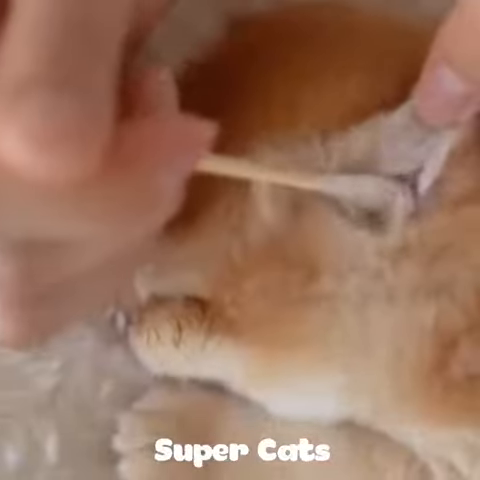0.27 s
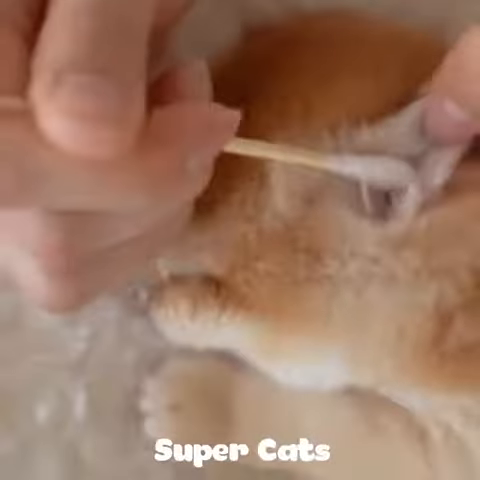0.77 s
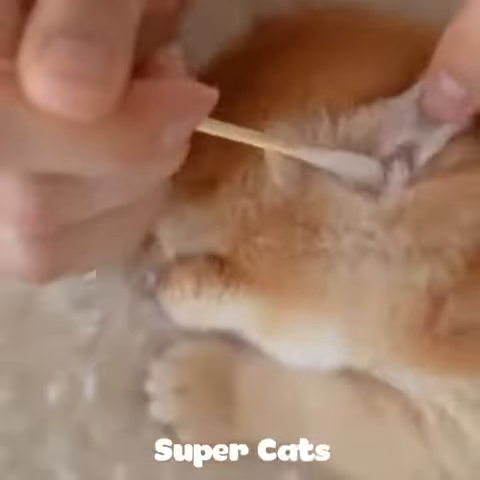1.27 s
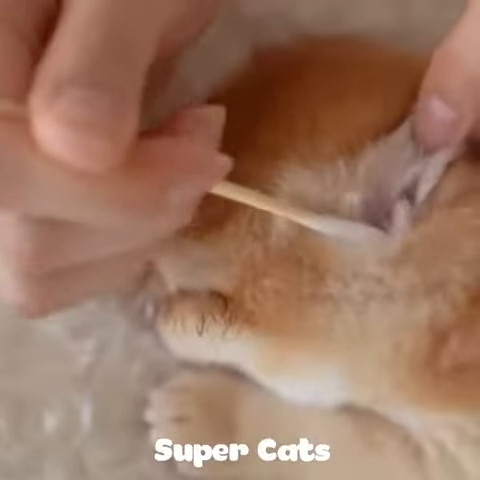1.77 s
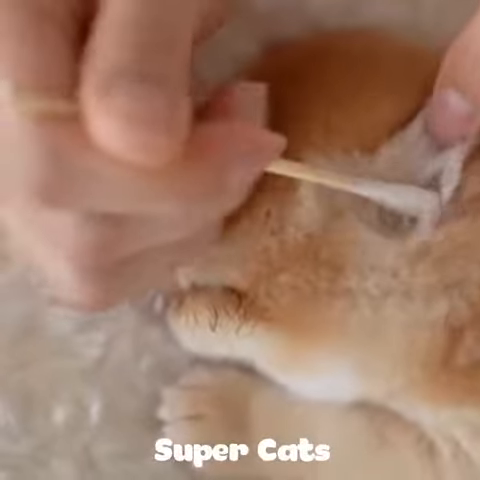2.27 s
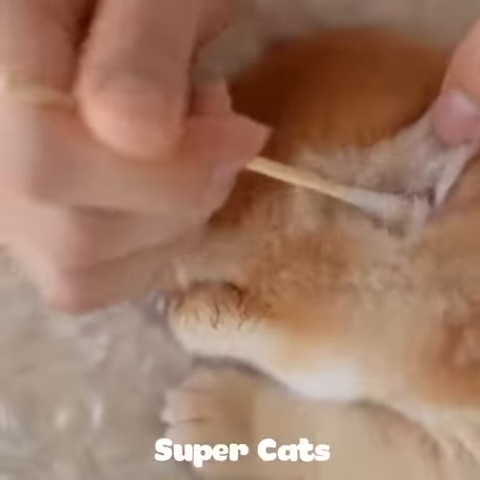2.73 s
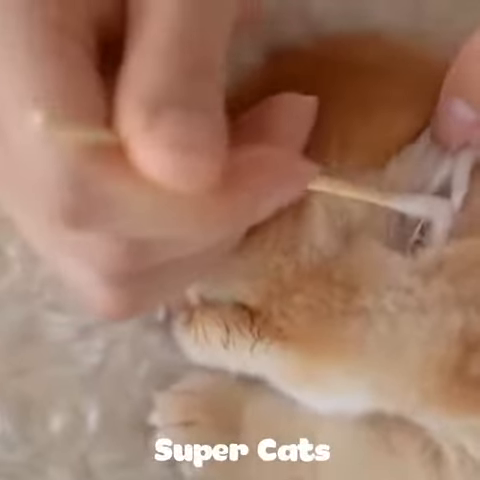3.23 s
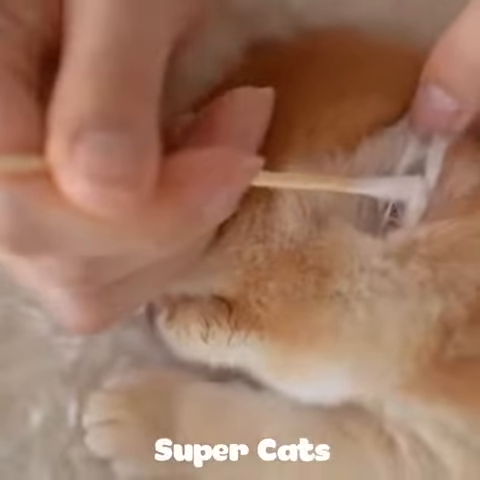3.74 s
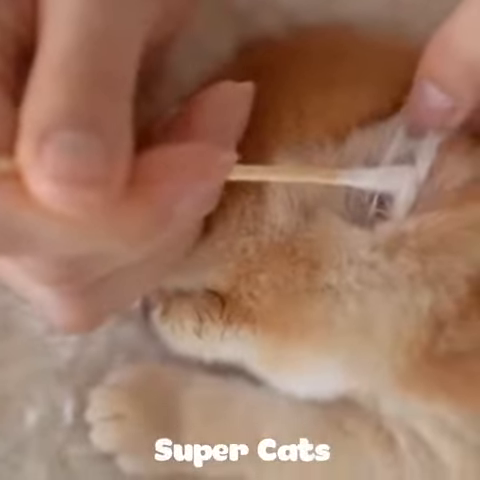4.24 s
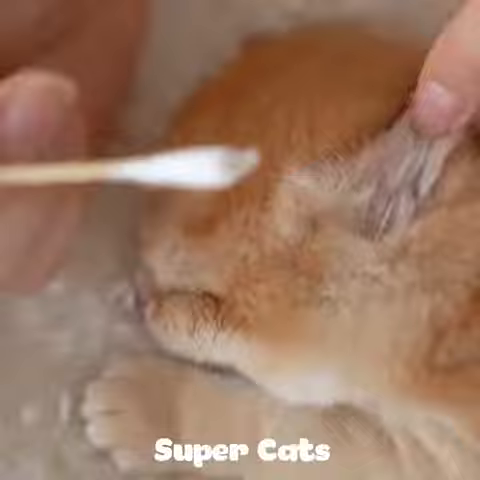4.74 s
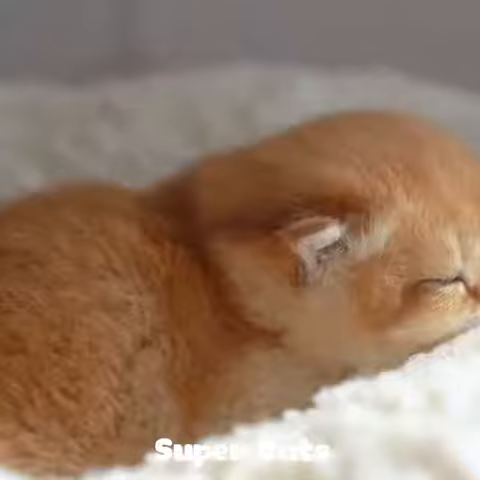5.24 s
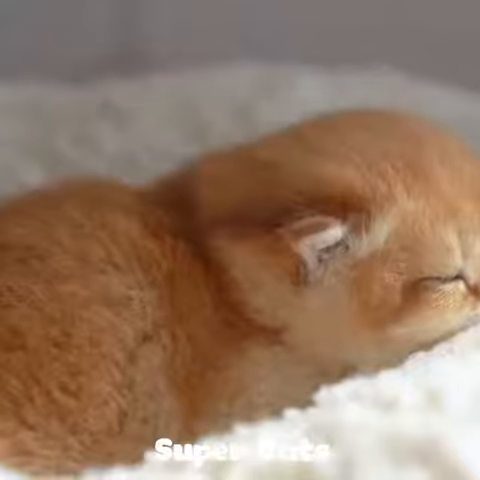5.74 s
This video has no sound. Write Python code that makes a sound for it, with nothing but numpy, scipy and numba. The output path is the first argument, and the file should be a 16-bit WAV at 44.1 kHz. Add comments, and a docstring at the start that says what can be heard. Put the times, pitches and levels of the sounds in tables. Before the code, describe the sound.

A cotton swab works back and forth in a kitten's ear, right against the left microphone. Its fibres hiss over skin and fur, creaking and slipping with small snaps and dull thuds. A faint gurgle comes from the right, then tacky ticks follow on the left and the swab swishes out. The quiet room then gives way to a low, wavering hum.

```python
"""Cleaning a kitten's ear

A cotton swab is worked back and forth in a kitten's ear, right at the left microphone.
Its fibres hiss over skin and fur. It creaks as it grips, catches and slips with dull thuds,
comes unstuck in tacky ticks and is drawn out with a swish.
A faint gurgle sounds on the right; at the end the quiet room gives way to a low hum."""
import sys
import numpy as np
from scipy import signal
from scipy.fft import rfft, irfft, next_fast_len
from scipy.io import wavfile
from scipy.ndimage import uniform_filter1d
from numba import njit

SR = 44100
rng = np.random.default_rng(int(sys.argv[2]) if len(sys.argv) > 2 else 0)


def pcm_store(signal):
    """Save signal as 16-bit PCM."""
    levels = np.round(np.clip(np.atleast_2d(signal), -1, 1) * 32767)
    wavfile.write(sys.argv[1], SR, levels.astype(np.int16).T)


N = 264644

# Tacky skin comes unstuck: (time [s], relative tick level [dB], pitch [Hz], relative ring level [dB])
TACKY_TICKS = [(3.6379, -18, 2900, -36), (3.706, -19, 2880, -40), (3.7184, -23, 3020, -37),
               (3.7317, -21.5, 3190, -35.5), (3.789, -26, 2770, -34), (3.8157, -22.5, 2830, -37),
               (3.837, -23.5, 2920, -37), (3.8929, -21, 2740, -44), (3.909, -32, 3130, -40),
               (3.9223, -24, 2800, -36.5), (3.9489, -26, 2360, -39), (3.9671, -20.5, 2900, -39),
               (4.0498, -20.5, 2940, -40.5), (4.144, -21.5, 2370, -40), (4.1706, -21.5, 2390, -37),
               (4.1874, -21, 2300, -38), (4.2026, -19.5, 2380, -35), (4.4238, -40, 2410, -59),
               (4.5702, -43, 3332, -56)]
# Runs of catching and letting go: (start [s], end [s], slips [per s], relative snap level [dB],
# relative thud level [dB], growth of the snap over the run [dB])
SLIP_RUNS = [(0.5573, 0.5797, 52, -17.5, -20.5, 1), (0.774, 0.816, 98, -19.5, -20.5, -6),
             (0.8325, 0.8467, 77, -15, -24, -4), (1.0734, 1.0818, 106, -24.5, -20, 3),
             (1.4654, 1.5, 128, -16, -37, 3), (1.508, 1.54, 125, -20.5, -33, -1),
             (1.5542, 1.5752, 97, -20.5, -20, 1), (1.5832, 1.5945, 105, -21, -19, 9.5),
             (1.7909, 1.7991, 122, -19.5, -44, -7), (1.8324, 1.859, 78, -19.5, -21.5, 3),
             (2.4666, 2.5793, 124, -16.5, -31, -2.5), (2.5911, 2.6253, 90, -16.5, -30, -4),
             (2.6336, 2.659, 108, -16.5, -26, 2.5), (2.6686, 2.709, 51, -21, -29, 5),
             (2.9247, 3.034, 85, -20, -21, -5.5), (3.0433, 3.0885, 87, -20, -23, -4),
             (3.109, 3.1483, 52, -18.5, -25.5, -7.5), (3.162, 3.187, 100, -23, -23.5, -6),
             (3.241, 3.2885, 65, -21, -20.5, -10.5), (3.3, 3.345, 67, -31, -25.5, -2)]


def from_db(db):
    """Turn decibels into a gain, the number a sound is multiplied by."""
    return 10 ** (np.asarray(db) / 20)


def rms_one(x):
    """Scale a sound to an average power of 1."""
    return x / np.sqrt(np.mean(x ** 2) + 1e-20)


def peak_one(x):
    """Scale a sound so that its outline peaks at 1."""
    return x / np.abs(signal.hilbert(x)).max()


def add(track, s, sound):
    """Mix a short sound into a track, s seconds in."""
    at = int(round(s * SR))
    track[at:at + len(sound)] += sound[:N - at]


def colour(x, spectrum):
    """Shape the tone with a curve of (frequency [Hz], level [dB]) points."""
    hz, db = np.transpose(spectrum)
    size = next_fast_len(N + 4096)
    bin_hz = np.maximum(np.fft.rfftfreq(size, 1 / SR), 1)
    gain = from_db(np.interp(np.log(bin_hz), np.log(hz), db))
    return irfft(rfft(x, size) * gain, size)[:N]


def soften(x, cut_hz):
    """Round off the treble, as a soft contact does."""
    return signal.sosfilt(signal.butter(2, cut_hz, fs=SR, output="sos"), x)


def noise(spectrum):
    """Steady noise with the given tone, at power 1."""
    return rms_one(colour(rng.standard_normal(N), spectrum))


def drift(rate):
    """A random wander that heads for a new value `rate` times a second."""
    place = np.arange(N) * rate / SR
    return rms_one(np.interp(place, np.arange(8192), rng.standard_normal(8192)))


def grains(per_s, spread_db):
    """Tiny clicks of uneven size at random moments."""
    sizes = from_db(spread_db * np.minimum(rng.exponential(1, N), 4))
    return sizes * rng.choice([-1, 1], N) * (rng.random(N) < per_s / SR)


def resonate(x, hz, width_hz):
    """Make a sound ring at one pitch; a narrower width rings longer."""
    r = np.exp(-np.pi * width_hz / SR)
    feedback = [1, -2 * r * np.cos(2 * np.pi * hz / SR), r * r]
    return signal.lfilter(np.array([1, 0, -1]) * (1 - r * r) / 2, feedback, x + 1e-18)


@njit
def glide(x, turn, r):
    """A ringing filter whose pitch (`turn`, in radians per sample) can move."""
    y = np.zeros(len(x))
    for i in range(2, len(x)):
        push = (1 - r * r) / 2 * (x[i] - x[i - 2])
        y[i] = push + 2 * r * np.cos(turn[i]) * y[i - 1] - r * r * y[i - 2]
    return y


def focused_ring(x, hz, width_hz):
    """Filter twice around a steady or sliding pitch, and scale to power 1."""
    turn = np.full(len(x), 2 * np.pi * hz / SR)
    r = np.exp(-np.pi * width_hz / SR)
    return rms_one(glide(glide(x, turn, r), turn, r))


def swell(s, rise_s, fall_s, rise_power=1.01, fall_power=0.88):
    """Gain of a movement that speeds up evenly until time s, then slows to rest."""
    t = np.arange(N) / SR - s
    speed = np.maximum(1 - np.maximum(-t / rise_s, t / fall_s), 0)
    return speed ** np.where(t < 0, rise_power, fall_power)


def background(room_db=-44.5, handling_db=-47, late_room_db=-36, hum_at_s=5.245, hum_hz=56.6, hum_db=-32):
    """A quiet room with a soft handling rumble; later a wavering low hum in a louder room."""
    # Tone of the room before and during the hum: (frequency [Hz], relative level [dB])
    quiet_tone = [(22, -2.5), (40, -3), (100, -0.5), (135, -5.5), (200, -9), (260, -12.5), (500, -27.5),
                  (1000, -27.5), (2000, -40.5), (4000, -47), (8800, -47), (10000, -50.5), (11500, -45),
                  (15000, -45.5)]
    humming_tone = [(20, -8.5), (36, 0.5), (55, -4.5), (80, -8.5), (130, -15.5), (270, -16.5), (420, -27),
                    (850, -33), (2000, -48.5), (4000, -54), (8700, -52.5), (10000, -59), (11500, -51),
                    (15000, -49)]
    t = np.arange(N) / SR
    handled = np.interp(t, [4.35, 4.7], [1, 0])
    handling = from_db(handling_db) * handled * np.array([noise(quiet_tone), noise(quiet_tone)])
    hum = np.sqrt(2) * np.sin(2 * np.pi * hum_hz * t) * from_db(hum_db + drift(rate=5.4))
    quiet = from_db(room_db) * noise(quiet_tone) + handling
    humming = hum + from_db(late_room_db) * noise(humming_tone)
    late = np.clip((t - hum_at_s) / 0.0097, 0, 1)
    return (1 - late) * quiet + late * humming


def gurgle():
    """A short, low bubbling amid three swells of a thin, wavering whine."""
    # The bubbling: (loudest at [s], rise [s], fall [s], level [dB])
    bubble_swell = (3.5, 0.01, 0.04, -27)
    # The whine: (loudest at [s], rise [s], fall [s], level [dB], pitch [Hz])
    whines = [(3.275, 0.052, .06, -36, 388), (3.425, 0.07, 0.031, -38, 418), (3.56, 0.04, 0.058, -45, 397)]
    *shape, db = bubble_swell
    bubbling = focused_ring(grains(per_s=800, spread_db=3), hz=205, width_hz=150)
    out = from_db(db) * swell(*shape) * soften(bubbling, cut_hz=420)
    wavering_s = np.cumsum(1 + 0.021 * drift(rate=130)) / SR
    for *shape, db, hz in whines:
        out += from_db(db) * swell(*shape) * np.sqrt(2) * np.sin(2 * np.pi * hz * wavering_s)
    return out


def drone(hz=112, db=-37):
    """A soft, wavering drone sounds while the swab rests before the first stroke."""
    held = np.interp(np.arange(N) / SR, [.42, .55], [1, 0])
    phase = 2 * np.pi * np.cumsum(hz * (1 + 0.057 * drift(rate=51.3))) / SR
    return held * from_db(db + 2 * drift(rate=41)) * np.sqrt(2) * np.sin(phase)


def thud(hz, fade_s):
    """Soft flesh swings and quickly settles."""
    t = np.arange(SR // 8) / SR
    return np.sin(2 * np.pi * hz * t) * np.exp(-t / fade_s)


def bumps(fade_s=0.026, boost_db=3, push_s=0.0035):
    """The ear flap and head are softly nudged and spring back with a slow, heavy swing."""
    # The nudges: (time [s], relative level [dB], pitch [Hz])
    nudges = [(0.849, -23.5, 74.6), (1.078, -23.5, 149.8), (1.21, -27, 119), (1.27, -21.5, 155.7),
              (1.599, -28, 130), (1.931, -28, 169), (2.119, -24.5, 82), (2.169, -28, 84),
              (3.437, -22.5, 64.6), (3.59, -26, 83.4), (4.319, -19, 66), (4.629, -31.5, 86.1)]
    out = np.zeros(N)
    for s, db, hz in nudges:
        swing = thud(hz, fade_s)
        push = 1 - np.exp(-np.arange(len(swing)) / SR / push_s)
        add(out, s, from_db(db + boost_db) * swing * push)
    return out


def touching(lift_s=4.43, fade_s=0.47):
    """A gain of 1 while the swab is in the ear, dying away as it is lifted."""
    return np.clip(1 - (np.arange(N) / SR - lift_s) / fade_s, 0, 1) ** 2


def rumble(drag_gain, resting_db=-43, vs_drag_db=-2, vs_thud_db=-7, linger_s=0.041):
    """Pressed flesh shudders under the swab: more as it drags, most during a run of slips."""
    # Tone of the flesh: (frequency [Hz], relative level [dB])
    flesh_tone = [(20, -18), (40, -18.5), (75, -0.5), (115, 1.5), (200, -5), (300, -14.5), (500, -18),
                  (1500, -46.5)]
    t = np.arange(N) / SR
    power = (from_db(resting_db) * touching()) ** 2 + (from_db(vs_drag_db) * drag_gain) ** 2
    for start_s, end_s, _, _, thud_db, _ in SLIP_RUNS:
        during = np.interp(t, [start_s - linger_s, start_s, end_s, end_s + linger_s], [0, 1, 1, 0])
        power += (from_db(thud_db + vs_thud_db) * during) ** 2
    shudder = noise(flesh_tone)
    strength = np.sqrt(uniform_filter1d(shudder ** 2, size=1500) + 1e-6)
    return np.sqrt(power) * shudder / strength  # dividing evens out the noise's own swells


def release(crumble, crumble_s):
    """One sharp release, trailed by a few fibres that let go after it."""
    t = np.arange(SR // 8) / SR
    return (t == 0) + crumble * rng.standard_normal(len(t)) * np.exp(-t / crumble_s)


def ticks(hollow_hz=1200, ring_boost_db=12, tick_boost_db=5, delay_s=0.001007):
    """Tiny sticky contacts stretch and part, each a bright tick over a hollow ring of the ear."""
    out = np.zeros(N)
    for s, tick_db, hz, ring_db in TACKY_TICKS:
        kick = soften(release(crumble=0.081, crumble_s=0.0022), cut_hz=12000)
        bright = resonate(resonate(kick, hz, width_hz=1000), hz, width_hz=4600)
        hollow = resonate(resonate(kick, hollow_hz, width_hz=570), hollow_hz, width_hz=1340)
        tick = from_db(tick_db + tick_boost_db) * peak_one(bright)
        ring = from_db(ring_db + ring_boost_db) * peak_one(hollow)
        add(out, s + delay_s, ring - tick)  # a short delay before each tick sounds
    return out


def juddering(slowing=.15, jitter_s=.0006, uneven_db=1.3):
    """Split each run into slips that spread out as the swab slows: (time [s], snap [dB], thud [dB])."""
    rows = []
    for start_s, end_s, per_s, snap_db, thud_db, growth_db in SLIP_RUNS:
        length_s = end_s - start_s
        along = np.linspace(0, 1, max(2, 1 + round(length_s * per_s)))
        late, harder, heavier = rng.standard_normal(size=(40, 3))[:len(along)].T
        times = start_s + length_s * along * (1 - slowing * (1 - along))
        times += jitter_s * late * np.sin(np.pi * along)  # least even in the middle of the run
        snaps = snap_db + growth_db * (along - .5) + uneven_db * harder
        rows += zip(times, snaps, thud_db + uneven_db * heavier)
    return rows


def slips(slip_rows, thud_boost_db=3, jolt_boost_db=-3, snap_boost_db=1):
    """Each slip jolts the ear and rings it with a snap; the stretched skin swings back with a thud."""
    # The rings in a snap: (pitch [Hz], width [Hz], relative level [dB])
    snap_rings = [(1474, 540, 21.5), (2980, 800, 8.5), (6100, 29000, -1)]
    out = np.zeros(N)
    for s, snap_db, thud_db in slip_rows:
        kick = soften(release(crumble=0.16, crumble_s=.0012), cut_hz=8000)
        detunes = np.exp(.07 * rng.standard_normal(len(snap_rings)))
        snap = sum(from_db(db) * resonate(kick, hz * detune, width)
                   for (hz, width, db), detune in zip(snap_rings, detunes))
        jolt = soften(resonate(kick, hz=300, width_hz=4850), cut_hz=900)
        crack = from_db(jolt_boost_db) * peak_one(jolt) + from_db(snap_boost_db) * peak_one(snap)
        swing = from_db(thud_db + thud_boost_db) * thud(hz=140, fade_s=0.0054)
        add(out, s, swing - from_db(snap_db) * crack)
    return out


def sticking(slip_rows, stick_s=.0075, dip_db=-7):
    """Just before each slip or tick the swab is stuck, so the rubbing dips."""
    t, stuck = np.arange(N) / SR, np.zeros(N)
    for s, *_ in slip_rows + list(TACKY_TICKS):
        near = slice(int(s * SR) - SR // 20, int(s * SR) + SR // 20)
        stuck[near] += np.exp(-((t[near] - s + stick_s / 2) / stick_s) ** 2)
    return from_db(dip_db * np.minimum(stuck, 1))


def stutter(per_s=125, depth_db=2.5, uneven=0.202):
    """Gain that makes a creak pulse unsteadily as the cotton grips and gives."""
    turns = np.cumsum(per_s * (1 + uneven * drift(rate=60))) / SR
    return from_db(depth_db * np.cos(2 * np.pi * turns))


def creaking(catches):
    """Tiny catches ring the ear at two pitches; the upper one slides as the swab changes depth."""
    # The cotton grips: (tightest at [s], rise [s], fall [s], lower level [dB], upper level [dB],
    # lower pitch [Hz], upper pitch [Hz], upper slide [octaves per s])
    creaks = [(0.685, 0.042, 0.082, -40, -33, 1610, 3500, -5.5),
              (0.82, 0.13, 0.2, -29.5, -39.5, 1610, 3020, 2),
              (1.416, 0.015, 0.078, -31, -34, 1460, 3860, -5),
              (1.485, 0.058, .16, -26, -34.5, 1500, 3000, -1.5),
              (1.70, 0.11, 0.15, -33.5, -40, 1600, 3850, -1),
              (2.29, 0.23, 0.065, -36.5, -32, 1680, 3070, 2),
              (2.48, 0.097, 0.12, -29.5, -44, 1450, 3240, 8),
              (2.94, 0.068, 0.25, -32.5, -48, 1720, 3500, 2.5),
              (3.4, 0.23, 0.13, -35.5, -46, 1670, 3300, 1), (3.545, .11, .11, -26.5, -30, 1466, 2970, 2.5),
              (3.734, 0.072, 0.14, -48, -39, 1430, 2970, -2),
              (3.93, 0.048, 0.052, -48, -39.5, 1500, 2830, 0),
              (4.198, 0.21, 0.054, -38.5, -40.5, 1950, 2700, -2),
              (4.295, .1, 0.043, -24.5, -30, 1930, 3030, -1)]
    out = np.zeros(N)
    for s, rise_s, fall_s, lower_db, upper_db, lower_hz, upper_hz, slide in creaks:
        gain = swell(s, rise_s, fall_s)
        at = np.flatnonzero(gain)
        lower = focused_ring(catches[at], lower_hz, width_hz=720)
        upper = focused_ring(catches[at], upper_hz * 2 ** (slide * (at / SR - s)), width_hz=1550)
        out[at] += gain[at] * (from_db(lower_db) * lower - from_db(upper_db) * upper)
    return out


def sweeping(resting_db=-57.5):
    """Gains of hiss and drag: each stroke adds to the faint sound of the swab lying on the skin."""
    # Strokes over the skin: (fastest at [s], rise [s], fall [s], fibre hiss [dB], dull drag [dB])
    strokes = [(0.15, 0.21, 0.14, -58, -52), (0.24, .03, 0.027, -47.5, -56), (0.566, 0.14, 0.068, -30, -32),
               (0.699, 0.1, 0.26, -41, -38), (0.895, 0.24, 0.14, -32.5, -34.5),
               (1.27, 0.3, 0.083, -32, -31.5), (1.36, .07, 0.1, -47.5, -44),
               (1.422, 0.02, 0.18, -37.5, -38.5), (1.685, 0.13, 0.11, -33, -34),
               (2.111, 0.38, .08, -28.5, -30.5), (2.28, 0.51, 0.083, -34.5, -40.5),
               (2.39, 0.047, 0.054, -31, -33), (2.48, .09, 0.18, -26.5, -31), (2.66, .08, 0.078, -41, -40),
               (2.8, 0.09, 0.11, -48.5, -54), (2.95, .13, 0.14, -37.5, -37),
               (3.182, 0.11, 0.032, -35.5, -30.5), (3.3, 0.066, 0.15, -41, -33),
               (3.571, .27, 0.088, -33, -31), (3.74, 0.045, 0.42, -53, -46), (4.13, 0.08, 0.39, -42.5, -43),
               (4.316, 0.12, 0.063, -24.5, -47)]
    hiss_power = (from_db(resting_db) * touching()) ** 2
    drag_power = hiss_power.copy()
    for s, rise_s, fall_s, hiss_db, drag_db in strokes:
        stroke = swell(s, rise_s, fall_s)
        hiss_power += (from_db(hiss_db) * stroke) ** 2
        drag_power += (from_db(drag_db) * stroke) ** 2
    return np.sqrt(hiss_power), np.sqrt(drag_power)


def rubbing(hiss_gain, drag_gain):
    """Thousands of fibres flick over the skin; the uneven grip shakes drag, hiss and creak together."""
    # Tones of the dull drag and the fibre hiss: (frequency [Hz], relative level [dB])
    drag_tone = [(100, -22), (250, 2), (450, -1), (750, -1), (1300, -1), (2200, -13.5), (5000, -18),
                 (16000, -57)]
    fibre_tone = [(100, -42), (300, -40), (1200, -9.5), (2500, -1.5), (5000, -1), (7000, -3), (8400, -7.5),
                  (11000, -11.5), (15000, -17)]
    # Dragging rings the ear: (pitch [Hz], width [Hz], level compared with the drag [dB])
    ear_rings = [(1450, 720, -6.5), (3500, 1800, -13)]
    grip = drift(rate=330)
    drag = rms_one(colour(grains(per_s=4000, spread_db=3) * from_db(2 * grip), drag_tone))
    hiss = rms_one(colour(grains(per_s=16000, spread_db=0.5) * from_db(1.3 * grip), fibre_tone))
    flicks, catches = (grains(per_s=6000, spread_db=3) * from_db(1.06 * grip) for _ in range(2))
    ring = sum(from_db(db) * focused_ring(flicks, hz, width) for hz, width, db in ear_rings)
    return drag_gain * (drag + ring) + hiss_gain * hiss + creaking(catches * stutter())


def scene():
    """The swab is at the left microphone, the gurgle at the right, the room in the middle."""
    # How much of the swab reaches the right microphone: (frequency [Hz], level [dB])
    far_side = [(60, -19), (160, -20.5), (1300, -20), (4000, -19), (8000, -18), (15000, -17)]
    hiss_gain, drag_gain = sweeping()
    slip_rows = juddering()
    rub = rubbing(hiss_gain, drag_gain) * sticking(slip_rows)
    swab = rub + rumble(drag_gain) + slips(slip_rows) + ticks() + bumps() + drone()
    stereo_swab = np.array([swab, colour(swab, far_side)])
    return stereo_swab + gurgle() * from_db([[-12], [0]]) + background()


def record(dry):
    """The sound fades in quickly, and the highest treble is cut."""
    fade = np.interp(np.arange(N) / SR, [.025, .045], [.03, 1])
    cutoff_hz = 15700
    return signal.sosfilt(signal.ellip(10, .2, 80, CUTOFF := cutoff_hz, fs=SR, output="sos"), dry * fade)


dry = scene()
out = record(dry)
pcm_store(out)
```